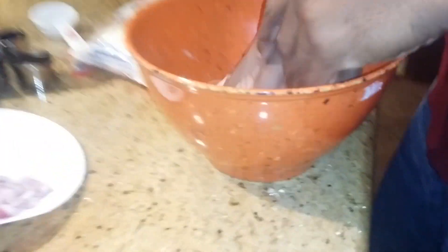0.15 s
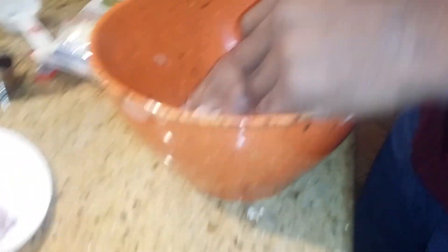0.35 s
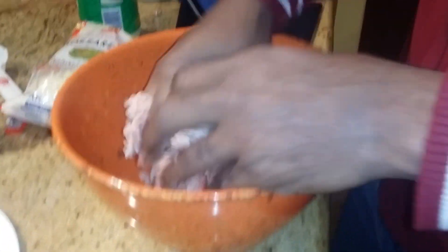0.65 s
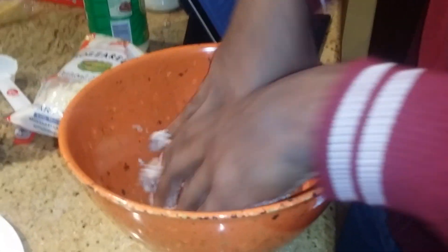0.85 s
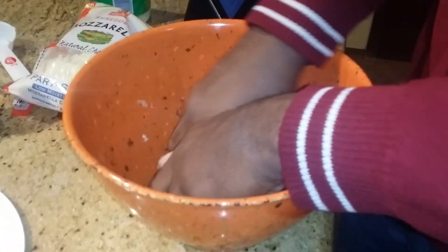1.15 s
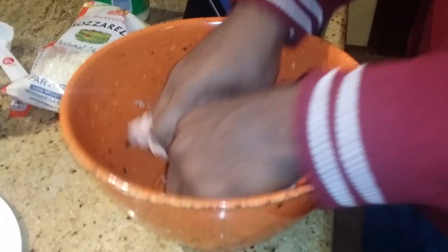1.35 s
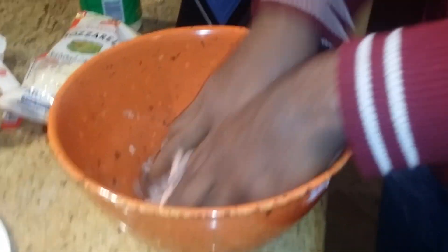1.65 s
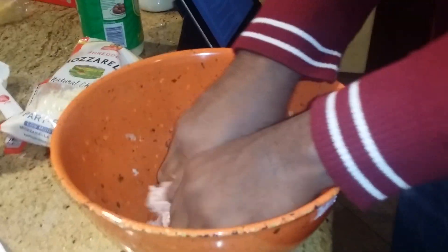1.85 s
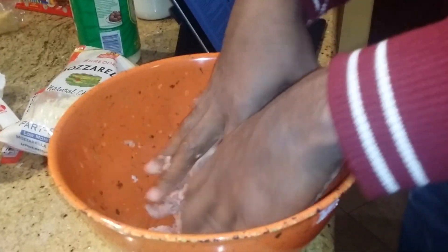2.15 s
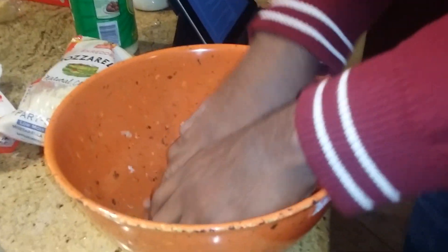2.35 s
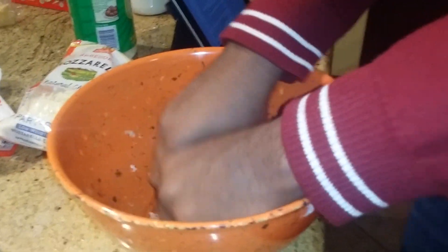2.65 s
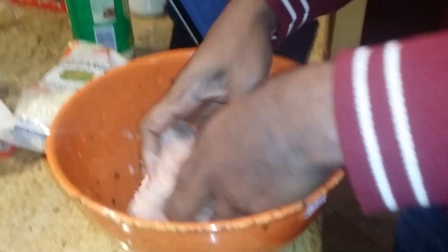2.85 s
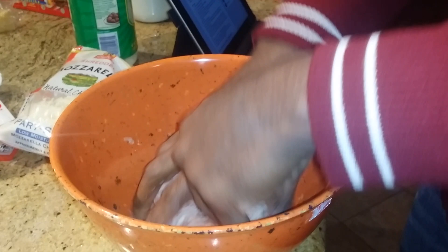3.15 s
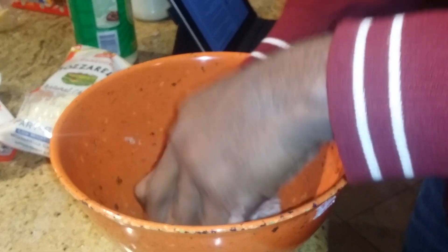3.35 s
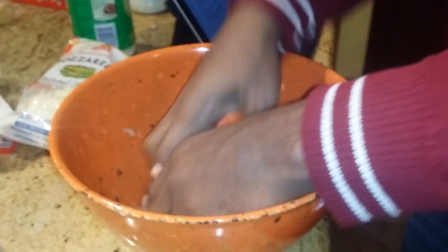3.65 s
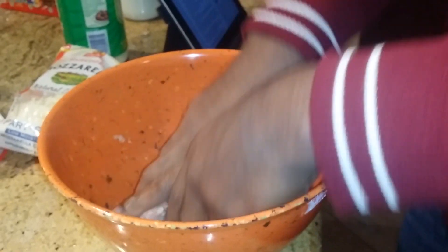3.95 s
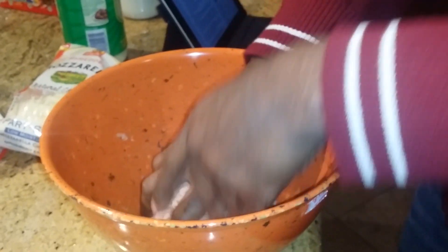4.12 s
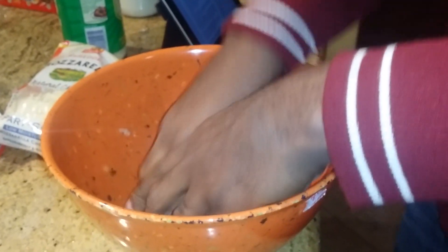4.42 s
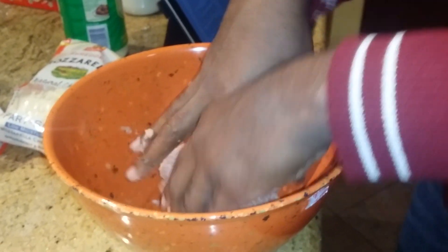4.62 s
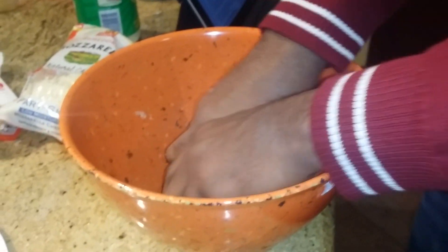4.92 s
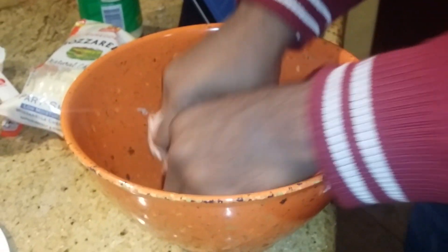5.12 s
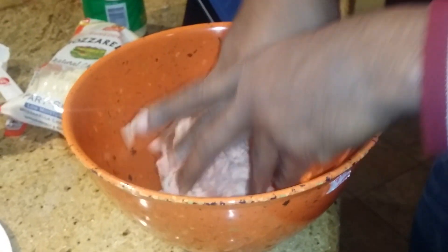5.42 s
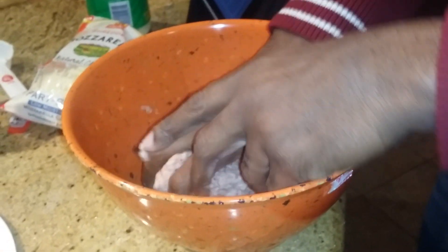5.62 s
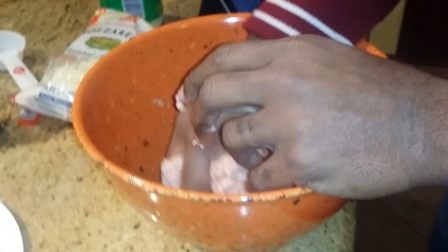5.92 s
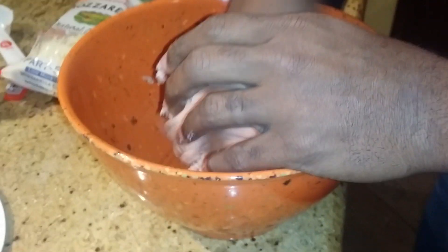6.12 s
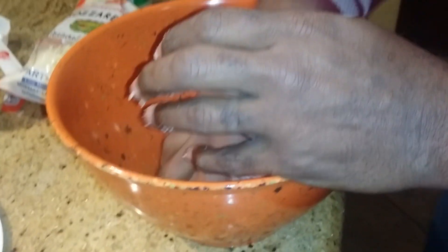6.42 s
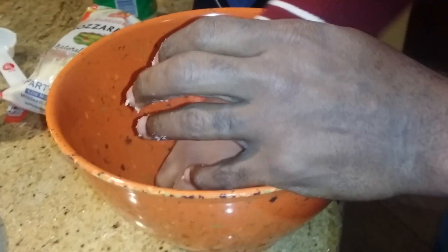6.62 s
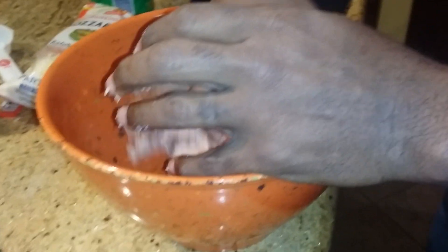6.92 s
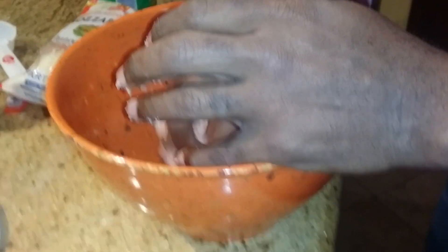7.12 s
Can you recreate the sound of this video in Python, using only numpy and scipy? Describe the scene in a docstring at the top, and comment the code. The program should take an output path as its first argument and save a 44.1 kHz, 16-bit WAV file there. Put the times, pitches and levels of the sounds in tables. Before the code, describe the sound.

Hands knead sticky raw meat in a bowl with wet crackles and squelches, while the bowl ticks, scuffs and thumps on a stone counter.

```python
"""Wet meat crackles and squelches with each squeeze; a plastic bowl rocks, ticks, scuffs and thumps.
Two hands knead raw meat and grated cheese in this bowl on a stone counter; an appliance hums nearby.
Tiny fading tones make the tearing and bursting; short noise bursts, filters and fading tones make the blows.
Filtered noise makes the scuffs and the fan, and sine waves the hum. The small room answers the blows.
The two ports of a close hand-held microphone each ring at their own pitches."""
import sys
import numpy as np
from scipy import signal
from scipy.fft import rfft, irfft, next_fast_len
from scipy.io import wavfile
from scipy.ndimage import map_coordinates

SR = 44100
rng = np.random.default_rng(int(sys.argv[2]) if len(sys.argv) > 2 else 0)


def inscribe(sig):
    """Save sig as 16-bit PCM at rate SR to the path in sys.argv[1].

    A 1-D sig is mono; a 2-D sig holds one channel per row.
    Samples are clipped to [-1, 1] before scaling.
    """
    pcm = np.round(np.clip(np.atleast_2d(sig).T, -1, 1) * 32767)
    wavfile.write(sys.argv[1], SR, pcm.astype(np.int16))


N = 320607  # length [samples]
TOP_HZ = 14700  # upper limit of the sound [Hz]

# tone colour of a dull thud: (frequency [Hz], relative level [dB])
THUD_COLOUR = [(30, -44), (70, -10.5), (130, -3), (260, -2), (380, 1), (540, 0), (650, -2), (800, -16),
               (1300, -25.5), (2200, -27.5), (5000, -39.5), (12000, -67)]
# tone colour of tearing wet films: (frequency [Hz], relative level [dB])
CRACKLE_COLOUR = [(1000, -39.5), (2400, -5.5), (3800, -10), (5200, -3.5), (7000, -0.5), (10000, 2.5),
                  (13000, 2), (15000, 1.5)]


def amp(db):
    """Turn decibels into a gain."""
    return 10 ** (np.asarray(db) / 20)


def unit(x):
    """Scale to an average strength (rms) of 1."""
    return x / np.sqrt(np.mean(x ** 2) + 1e-20)


def unit_energy(x):
    """Scale each channel to a total energy of 1."""
    return x / np.sqrt(np.sum(x ** 2, axis=-1, keepdims=True) + 1e-20)


def along(points, hz):
    """Read a value between (Hz, value) points, on a logarithmic pitch axis."""
    f, v = np.transpose(points)
    return np.interp(np.log(hz + 1), np.log(f + 1), v)


def wobble(rate):
    """Draw a smooth random curve through this many random points a second."""
    position = np.arange(N) * rate / SR
    coarse = position[::32]
    knots = rng.standard_normal(int(N * rate / SR) + 4)
    return np.interp(position, coarse, map_coordinates(knots, [coarse]))


def coloured(x, spectrum, size=2048):
    """Filter x to a (Hz, dB) shape, without any sound ahead of its cause."""
    log_gain = np.log(amp(along(spectrum, np.fft.rfftfreq(size, 1 / SR))))
    cepstrum = irfft(log_gain)
    # folding the cepstrum forward gives a minimum-phase filter
    cepstrum[1:size // 2] *= 2
    cepstrum[size // 2 + 1:] = 0
    response = irfft(np.exp(rfft(cepstrum)))
    return signal.fftconvolve(x, response[None], axes=1)[:, :x.shape[1]]


def spread(pair):
    """Mix two unrelated signals into left and right: most alike in the bass, unrelated in the high treble."""
    # how alike left and right are: (frequency [Hz], likeness [0 to 1])
    likeness = [(40, 0.42), (200, 0.82), (550, 0.71), (1100, 0.53), (2500, 0.51), (5000, 0)]
    length = pair.shape[1]
    m = next_fast_len(length)
    turn = np.arccos(np.clip(along(likeness, np.fft.rfftfreq(m, 1 / SR)), -1, 1)) / 2
    mid, side = irfft(rfft(pair, m) * [np.cos(turn), np.sin(turn)], m)[:, :length]
    return np.array([mid + side, mid - side])


def noise(length):
    """White noise as the two ports hear it."""
    return spread(rng.standard_normal((2, length)))


def room_tail():
    """A fresh answer of the kitchen: noise in which each frequency dies at its own speed."""
    # how long the kitchen rings: (frequency [Hz], time to fade by 60 dB [s])
    fade_times = [(100, 0.28), (500, 0.31), (2500, .27), (8000, 0.23), (15000, 0.19)]
    hz, t, z = signal.stft(noise(SR // 2), SR, nperseg=256)
    fade = amp(-60 * t / along(fade_times, hz)[:, None])
    tail = signal.istft(z * fade, SR, nperseg=256)[1][:, :SR // 2]
    return tail * (1 - np.exp(-np.arange(SR // 2) / SR / 0.0014))  # soft start


def contact(t60, rough_db=7):
    """A rough contact: noise with uneven tiny catches that fades by 60 dB in t60 seconds."""
    t = np.arange(SR // 8) / SR
    catches = np.interp(t, np.arange(125) / 1000, rng.standard_normal(125))
    level_db = rough_db * np.clip(catches, -1, 1) - 60 * t / t60
    return noise(len(t)) * amp(level_db) * (1 - np.exp(-t / 0.00065))


def add(track, s, sound):
    """Mix a sound in at time s [s]."""
    start = max(round(s * SR), 0)
    track[:, start:start + sound.shape[1]] += sound[:, :N - start]


def blow(push, spectrum, echo_db):
    """A push sounds a body; the room answers in the same colour."""
    sound = amp(echo_db) * unit_energy(coloured(room_tail(), spectrum))
    add(sound, 0, unit_energy(coloured(push, spectrum)))
    return sound


def ring(modes):
    """A struck body rings in fading tones, at new strengths for each blow."""
    t = np.arange(SR // 2) / SR
    # random spread of strength [dB] and of pitch [fraction]
    chance = rng.standard_normal((len(modes), 2)) * [2.5, .005]
    sound = 0
    for (hz, db, t60), (gain_db, detune) in zip(modes, chance):
        fade = amp(db + gain_db - 60 * t / t60)
        sound = sound + fade * np.sin(2 * np.pi * hz * (1 + detune) * t)
    return unit_energy(sound * (1 - np.exp(-t / 0.0012)))


def grains(rate, centre_hz, scatter, cycles, size_db, size=128):
    """Tiny bursting films: fading tones of random pitch and size that reach the two ports unequally."""
    # rate: bursts a second; scatter: octaves either way; size: length of each in samples
    draw = rng.random((int(rate * N / SR), 6))
    hz = np.minimum(centre_hz * 2 ** (scatter * (2 * draw[:, 1:2] - 1)), TOP_HZ)
    strength = amp(size_db * np.minimum(-np.log(1 - draw[:, 2:3]), np.log(60)))
    phase = hz * np.arange(size) / SR  # in cycles
    shape = strength * np.sin(2 * np.pi * phase) * np.exp(-phase / cycles)
    start = (draw[:, :1] * N).astype(int) + np.arange(size)
    lag = ((draw[:, 3:4] - .5) * SR * .0005).astype(int)  # right port up to 0.25 ms early or late
    left_shape = shape * (.5 + draw[:, 4:5])
    right_shape = shape * (.5 + draw[:, 5:6])
    left = np.bincount(start.ravel(), left_shape.ravel(), N)[:N]
    right = np.bincount(np.abs(start + lag).ravel(), right_shape.ravel(), N)[:N]
    return unit(np.array([left, right]))


def in_bowl(x, t60, wet_db):
    """Quick reflections between the bowl's walls and the hands thicken the sound."""
    reflections = signal.fftconvolve(x, unit_energy(contact(t60)), axes=1)[:, :N]
    return unit(x + amp(wet_db) * reflections)


def panned(sound, pan_db):
    """Make the left louder than the right by pan_db."""
    return sound * amp(pan_db * np.array([[.5], [-.5]]))


def squeezing(column, growth_db, lead_s):
    """Level [dB] of one squeeze sound: it changes steadily from grip to peak, then falls ever faster."""
    # one row per squeeze of the hands; the levels are relative:
    # (grip [s], tightest [s], release length [s], crackle [dB], squelch [dB], bowl scuff [dB], dull rub [dB])
    squeeze_rows = [(0.0, 0.337, 0.63, -46, -58, -54, -47.5), (0.493, 0.62, 0.31, -43, -61, -55, -51.5),
                    (0.878, 1.373, 0.22, -39.5, -52.5, -49.5, -50.5),
                    (1.56, 2.09, 0.12, -38.5, -49, -50.5, -48),
                    (2.296, 2.782, 0.26, -40, -52.5, -52, -51.5),
                    (3.165, 3.635, 0.19, -40, -55.5, -53, -53), (3.96, 4.517, 0.14, -41, -56.5, -54.5, -52),
                    (4.776, 5.09, 0.59, -42, -54.5, -54, -51),
                    (5.707, 6.117, 0.15, -40.5, -57, -54.5, -50.5),
                    (6.553, 6.73, 0.54, -45.5, -62, -56.5, -54), (6.917, 7.225, 0.24, -53, -56, -57.5, -47)]
    grip_length_s = 0.14  # length of the fade-in ahead of the grip, and least time from grip to peak
    release_db = 26.5  # fall below the squeeze's level over one release length
    rest_db = -72.5  # the meat settles faintly between squeezes (relative level)
    t = np.arange(0, N, 64) / SR
    power = amp(rest_db) ** 2
    for grip_s, tightest_s, release_s, *levels_db in squeeze_rows:
        peak_s = max(tightest_s - lead_s, grip_s + grip_length_s)
        slack = np.clip((peak_s - t) / (peak_s - grip_s), 0, 1)  # 1 at the grip, 0 at the peak
        before = np.maximum(grip_s - t, 0) / grip_length_s
        after = np.maximum(t - peak_s, 0) / release_s
        level_db = levels_db[column] - growth_db * slack - release_db * (before + after) ** 2
        power = power + amp(level_db) ** 2
    return np.interp(np.arange(N) / SR, t, 10 * np.log10(power))


def appliance():
    """Steady fan noise with slightly unsteady hum tones."""
    # hum tones: (frequency [Hz], relative level [dB])
    hum_tones = [(118.4, -63.5), (156.1, -64.5), (215.3, -63.5), (296.1, -62), (355.3, -64.5), (414.5, -61)]
    # colour of the fan noise: (frequency [Hz], relative level [dB])
    fan_colour = [(25, -52), (55, -7), (120, 0), (220, -21.5), (310, 3.5), (410, -6.5), (520, -8.5),
                  (750, -7.5), (1300, -23.5), (4000, -23), (8000, -10.5), (15000, -30)]
    t = np.arange(N) / SR
    hum = 0
    for hz, db in hum_tones:
        strength = amp(db + 0.57 * wobble(2.85))
        hum = hum + strength * np.sin(2 * np.pi * hz * t + 0.28 * wobble(7.0))
    fan = unit(coloured(noise(N), fan_colour))
    return amp(-0.5) * hum + amp(-54) * fan


def kneading():
    """Wet films tear in clumps over a smooth smear; trapped air squelches in small pockets."""
    # colour of the squelch: (frequency [Hz], relative level [dB])
    squelch_colour = [(400, -0.5), (800, -12.5), (1200, -3.5), (2000, -1), (3200, -6.5), (6000, -29)]
    crackle_db = squeezing(column=0, growth_db=12, lead_s=0.016)
    squelch_db = squeezing(column=1, growth_db=9, lead_s=0.062)
    clumps_db = 1.3 * wobble(55)
    smear = amp(-3)
    tearing = grains(rate=1900, centre_hz=8200, scatter=1, cycles=1.6, size_db=3.7)
    films = in_bowl(tearing, t60=.02, wet_db=-4)
    crackle = unit(coloured(films + smear * noise(N), CRACKLE_COLOUR))
    bursting = grains(rate=1100, centre_hz=1500, scatter=1, cycles=2.5, size_db=2.7, size=400)
    pockets = in_bowl(bursting, t60=.025, wet_db=-2)
    squelch = unit(coloured(pockets + smear * noise(N), squelch_colour))
    return crackle * amp(crackle_db + clumps_db) + squelch * amp(squelch_db + clumps_db + 2.0)


def pressing():
    """The lump shifts under the hands in soft, dull pats, most as they take hold."""
    rub_db = squeezing(column=3, growth_db=-3.5, lead_s=0.0)
    pats = grains(rate=260, centre_hz=350, scatter=1.2, cycles=1.2, size_db=2, size=1200)
    return unit(coloured(pats + noise(N), THUD_COLOUR)) * amp(rub_db - 9)


def scuffing():
    """While the hands push, the foot of the bowl sticks and slips: noise coloured by the thin wall."""
    # colour of the scuff: (frequency [Hz], relative level [dB])
    scuff_colour = [(1500, -22), (2150, -11.5), (2480, -5.5), (2720, -9.5), (3200, -13), (5000, -9),
                    (9000, -51)]
    scuff_db = squeezing(column=2, growth_db=0.5, lead_s=0.028)
    return unit(coloured(noise(N), scuff_colour)) * amp(scuff_db + 2.5 * wobble(60) - 3.5)


def smacks():
    """Single films of meat let go of the fingers at random, also between squeezes."""
    films = grains(rate=22, centre_hz=9000, scatter=.7, cycles=2, size_db=3.5)
    return amp(-61.5) * unit(coloured(in_bowl(films, t60=0.023, wet_db=-7.5), CRACKLE_COLOUR))


def pops():
    """Air pockets pop and sticky meat peels off: wet snaps around their own pitch, longer ones with more energy."""
    # the loudest snaps:
    # (time [s], relative level [dB], centre pitch [Hz], 60 dB fade time [s], left minus right [dB])
    pop_rows = [(0.05, -32, 1370, 0.1, -6), (0.057, -31, 9400, 0.21, -7.5),
                (0.596, -17.5, 8900, 0.0097, -1), (0.7666, -24, 8300, 0.0076, -9),
                (1.392, -19.5, 8200, 0.029, -5), (1.403, -17, 8600, 0.047, -4.5),
                (1.574, -23, 9100, 0.008, -6.5), (2, -19, 5000, 0.0037, -1), (2.072, -26.5, 7500, 0.064, 4),
                (2.1241, -17.5, 6900, 0.0091, 2.5), (2.4907, -17, 9800, 0.0057, 4),
                (2.83, -17.5, 8400, 0.0047, 0), (2.9455, -22.5, 10800, 0.012, 7),
                (4.375, -39, 1500, 0.052, 12), (4.468, -20.5, 6850, .014, 1), (4.833, -23.5, 6800, 0.01, 0),
                (5.06, -32.5, 7400, 0.091, -4), (5.204, -21, 8250, 0.021, 1.5),
                (5.294, -34.5, 1890, 0.053, 6), (5.313, -23.5, 9200, 0.037, -2),
                (6.424, -22, 4370, 0.019, -7), (7.0843, -26, 8300, 0.0057, -19.5)]
    # colour of a wet snap: (multiple of its centre pitch [ratio], relative level [dB])
    snap_colour = [(.08, -14), (.45, -14), (.9, 2), (1.5, -3.5), (3, -10.5)]
    out = np.zeros((2, N))
    for s, db, hz, t60, pan_db in pop_rows:
        colour = [(hz * ratio, level) for ratio, level in snap_colour]
        life = max(t60, .002)
        snap = panned(blow(contact(life), colour, echo_db=-2.5), pan_db)
        add(out, s, amp(db + 28.5) * np.sqrt(life) * snap)
    return out


def thumps():
    """One soft push through the meat into bowl and counter; they and the room boom after it."""
    # pushes: (time [s], relative level [dB], bass weight [dB])
    thump_rows = [(0.054, -31.5, 12.5), (0.082, -30, 30), (0.28, -32, -15), (1.044, -35.5, -6),
                  (1.172, -33, 18), (1.289, -38.5, 11), (1.369, -8, -3.5), (1.394, -33, -9),
                  (1.438, -19, -0.5), (1.573, -28, 6), (1.73, -19, -5), (1.857, -28, 1),
                  (2.741, -26.5, 12.5), (3.89, -35, 22), (6.425, -20.5, -1), (6.451, -25.5, 0),
                  (7.086, -32.5, 16.5)]
    # tones of the loaded bowl on the counter: (frequency [Hz], relative level [dB], 60 dB fade time [s])
    boom_modes = [(196.3, -6, 0.52), (241, -4, 0.39), (267, 0, 0.41), (373.6, -0.5, 0.41), (454, -18, 0.68),
                  (517, -0.5, 0.29), (570, -3, 0.44)]
    out = np.zeros((2, N))
    push = np.tile(signal.unit_impulse(SR // 8), (2, 1))
    for s, db, weight_db in thump_rows:
        # a slow, heavy push favours the bass, in the thud and in the modes
        def bass_db(hz):
            return weight_db / (1 + (hz / 290) ** 4)

        colour = [(hz, level + bass_db(hz)) for hz, level in THUD_COLOUR]
        modes = [(hz, level + bass_db(hz), t60) for hz, level, t60 in boom_modes]
        thud = blow(push, colour, echo_db=1.0)
        boom = amp(-2.5) * ring(modes)
        add(out, s, amp(db + 17.0) * (thud + boom))
    return out


def taps():
    """The hard foot of the bowl ticks on stone: its wall rings, with a hollow knock under it."""
    # ticks: (time [s], relative level [dB], hollow knock relative to the tick [dB])
    tap_rows = [(0.163, -24.5, -10.5), (0.18, -17.5, -12.5), (1.669, -26, -8), (1.7372, -23, -12),
                (2.137, -26.5, -22), (2.2898, -26, -9.5), (2.354, -29.5, -9), (2.378, -36, -6),
                (2.4471, -34, 0), (2.7774, -24, -26), (2.9805, -20.5, -24), (3.1992, -16.5, -20.5),
                (3.3869, -28, -15), (3.8898, -27.5, -10), (4.0217, -29.5, -13), (4.1098, -27, -15),
                (4.3492, -25, -19), (4.693, -36, -11), (4.742, -32.5, -8), (5.5464, -21.5, -10),
                (5.5507, -19, -17.5), (5.59, -24, -17), (6.377, -21.5, -20), (6.3905, -10.5, -19.5)]
    # colour of the tick: (frequency [Hz], relative level [dB])
    tick_colour = [(700, -18), (1400, -26), (1950, -21), (2450, 4), (2750, -9), (3200, -9.5), (4000, -9.5),
                   (5000, -8), (7000, -12.5), (9500, -10.5), (12000, -20), (15000, -37)]
    # colour of the hollow knock: (frequency [Hz], relative level [dB])
    knock_colour = [(50, -7), (130, 2.5), (580, 13.5), (800, -2), (1000, 5), (1400, -19), (3000, -73)]
    # tones of the bowl's thin wall: (frequency [Hz], relative level [dB], 60 dB fade time [s])
    wall_modes = [(2530, -18, 0.21), (2749, 12, 0.028), (5320, 11, 0.063)]
    out = np.zeros((2, N))
    for s, db, knock_db in tap_rows:
        # a tap that knocks hollow also sounds the room more
        tick = blow(contact(t60=0.021), tick_colour, echo_db=2.5 + 0.29 * knock_db)
        wall = amp(-6.5) * ring(wall_modes)
        knock = blow(contact(t60=0.026), knock_colour, echo_db=1.5)
        add(out, s, amp(db + 12.0) * (tick + wall))
        add(out, s, amp(db + knock_db + 17.5) * knock)
    return out


def clacks():
    """The bowl is knocked hard and rattles: sharp knocks in quick succession, louder on the right."""
    # knocks: (time [s], relative level [dB])
    clack_rows = [(0.5092, -20.5), (0.5124, -16.5), (0.5198, -13.5), (0.534, -24)]
    # colour of a knock: (frequency [Hz], relative level [dB])
    clack_colour = [(100, -47), (500, 4), (950, 5.5), (1400, -1), (2800, 1.5), (4000, -2), (6000, 5.5),
                    (8500, 7), (10000, 11), (12500, -8), (15000, -6)]
    out = np.zeros((2, N))
    for s, db in clack_rows:
        strike = contact(t60=.018)
        add(out, s, amp(db + 14.5) * blow(strike, clack_colour, echo_db=-9.5))
    return panned(out, pan_db=-5)


def rasps():
    """The bowl drags with a whistling rub: a narrow band of noise swells and fades."""
    # drags: (loudest moment [s], half length [s], pitch [Hz], level at the loudest moment [dB])
    rasp_rows = [(7.07, 0.085, 2710, -53.5)]
    t = np.arange(N) / SR
    out = np.zeros((2, N))
    for middle_s, width_s, hz, db in rasp_rows:
        band_filter = signal.butter(2, [hz * .94, hz * 1.06], "bandpass", fs=SR, output="sos")
        band = unit(signal.sosfilt(band_filter, noise(N)))
        out += amp(db) * band * np.exp(-((t - middle_s) / width_s) ** 2)
    return out


def scene():
    """Meat and bowl over the hum of the kitchen."""
    meat = kneading() + pressing() + smacks() + pops()
    bowl = scuffing() + thumps() + taps() + clacks() + rasps()
    return appliance() + meat + bowl


def record(dry):
    """The sound reaches the left port first; each port adds its own resonances, up to the band limit."""
    # colour of the left port: (frequency [Hz], gain [dB])
    left_colour = [(400, 1.5), (1400, 3), (2450, 4), (3100, 4), (3900, 1.5), (5000, 2.5), (6100, 5.5),
                   (6850, 11), (7700, 3), (9200, -1), (12000, 0.5), (15000, -3.5)]
    # colour of the right port: (frequency [Hz], gain [dB])
    right_colour = [(400, 1.5), (1400, 0), (2200, 2), (2700, 12.5), (3400, 6), (4500, 0.5), (6900, -2.5),
                    (7700, 3), (8500, 6.5), (10000, 2.5), (12000, 2), (15000, -3.5)]
    ports = np.vstack([coloured(dry[:1], left_colour), coloured(dry[1:], right_colour)])
    m = next_fast_len(N + SR // 2)
    hz = np.fft.rfftfreq(m, 1 / SR)
    lead_s = .00011 * np.array([[.5], [-.5]])  # left early, right late
    lead = np.exp(2j * np.pi * hz * lead_s)
    low_pass = 1 / (1 + (hz / TOP_HZ) ** 140)
    return irfft(rfft(ports, m) * lead * low_pass, m)[:, :N]


dry = scene()
out = record(dry)
inscribe(out)
```